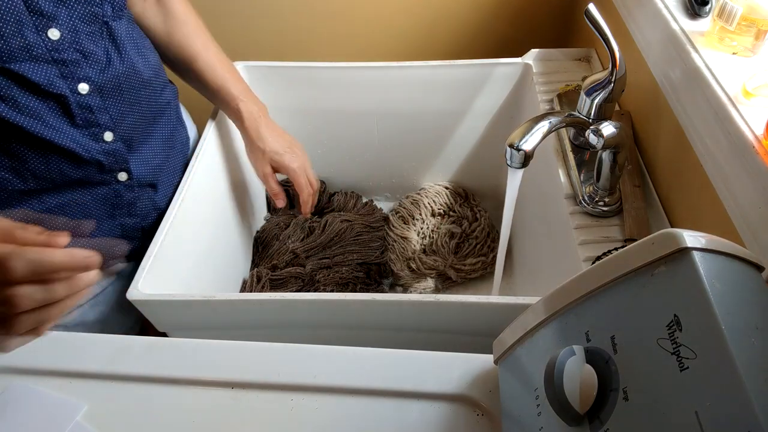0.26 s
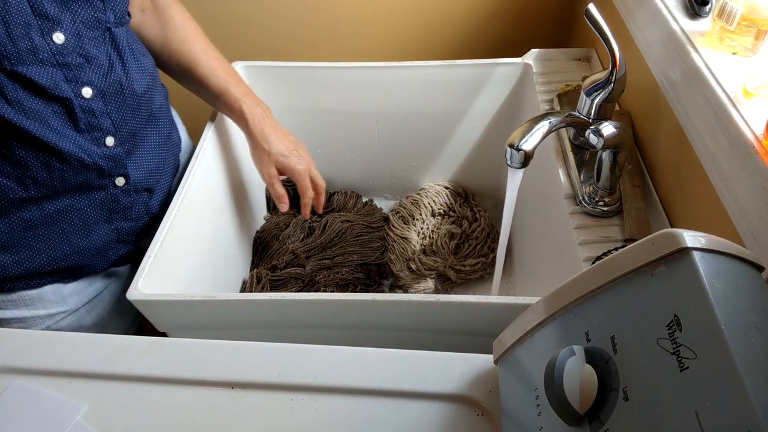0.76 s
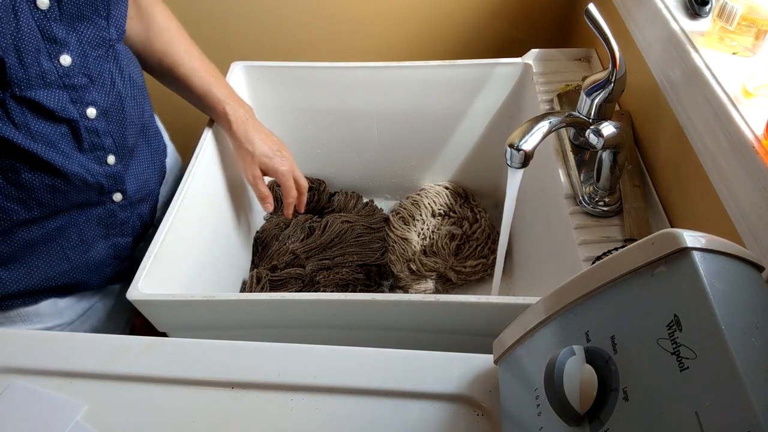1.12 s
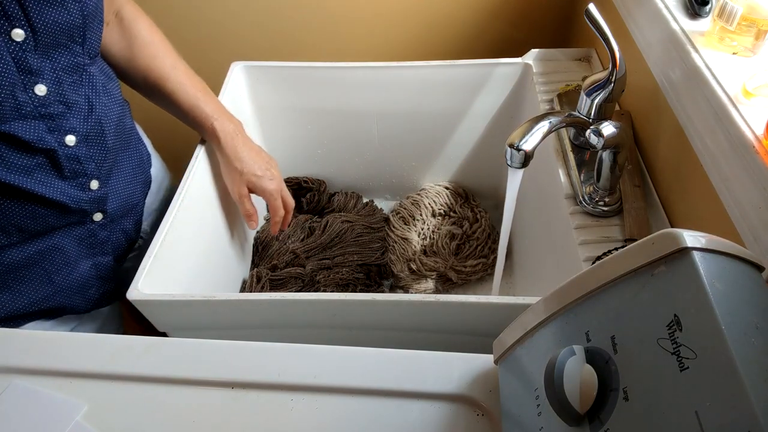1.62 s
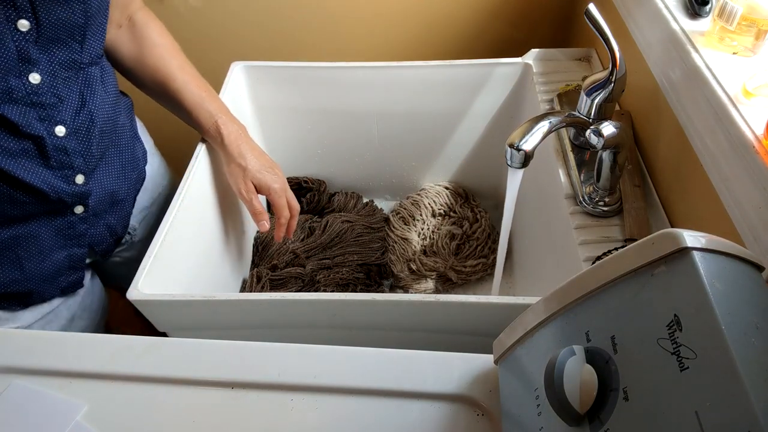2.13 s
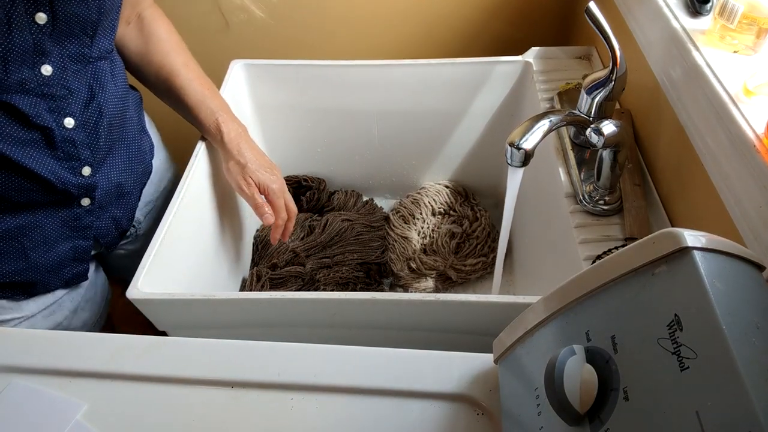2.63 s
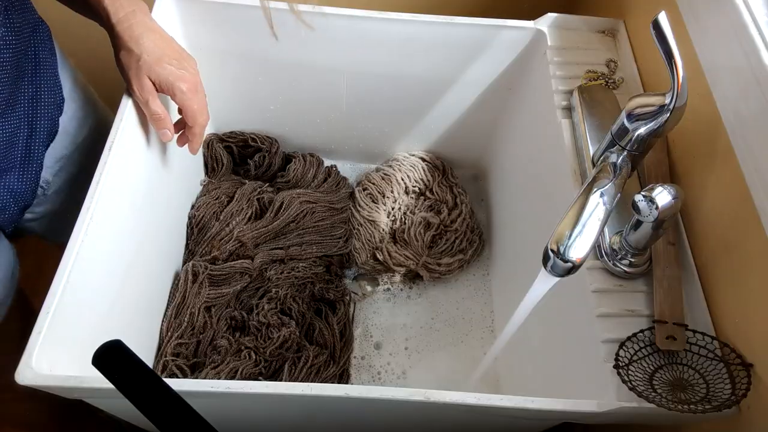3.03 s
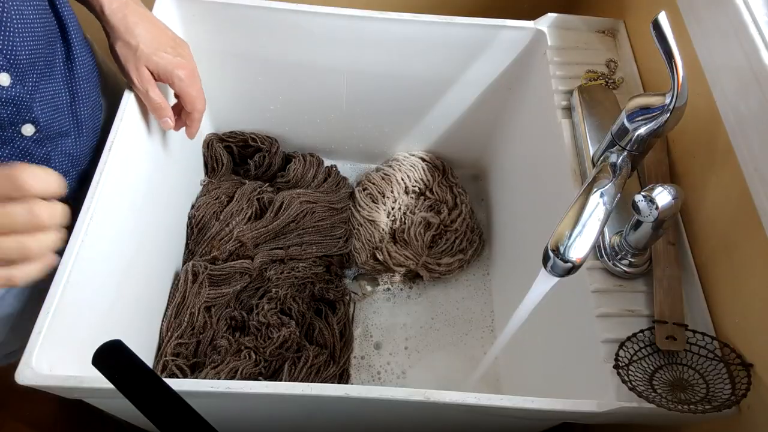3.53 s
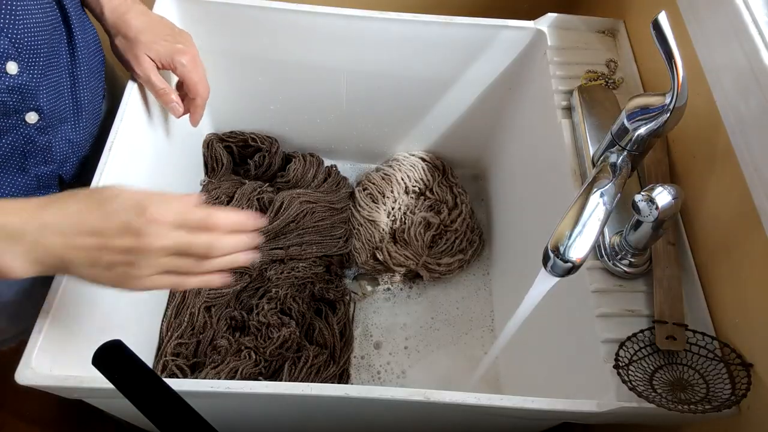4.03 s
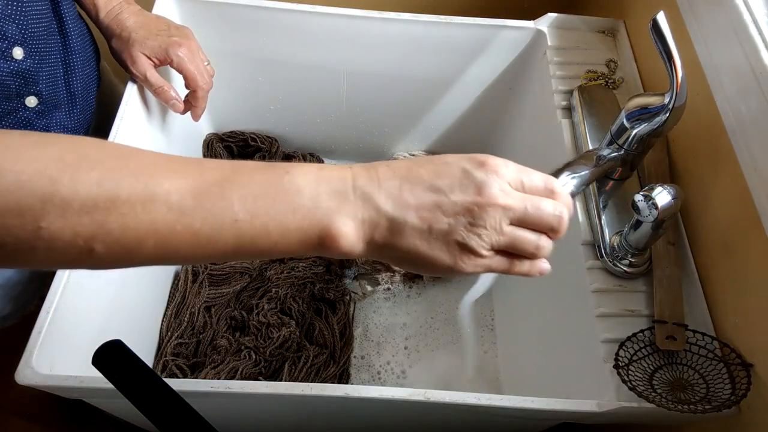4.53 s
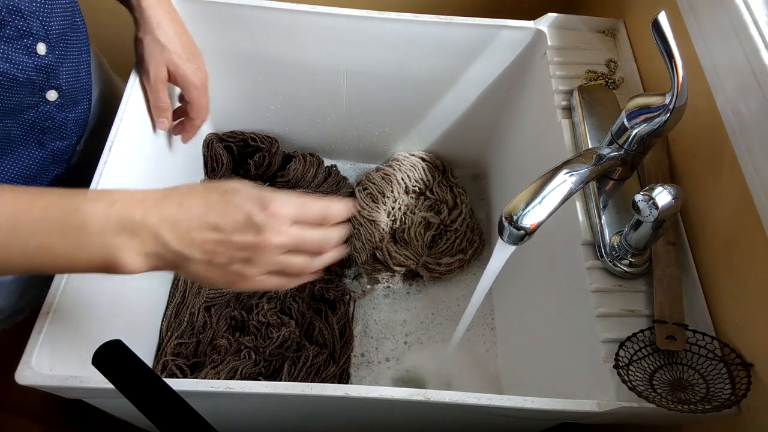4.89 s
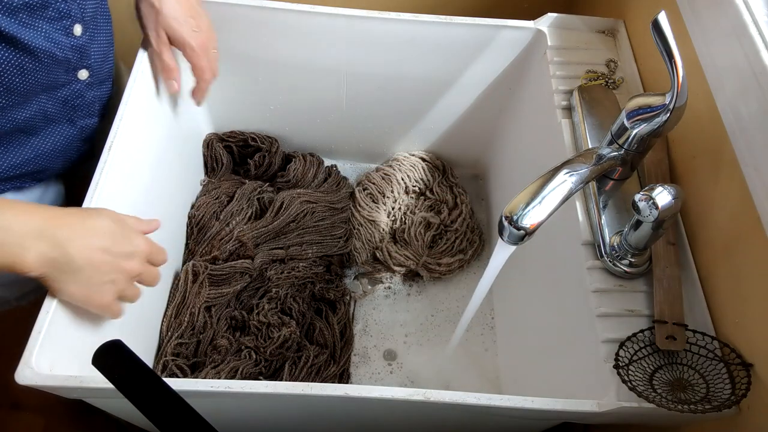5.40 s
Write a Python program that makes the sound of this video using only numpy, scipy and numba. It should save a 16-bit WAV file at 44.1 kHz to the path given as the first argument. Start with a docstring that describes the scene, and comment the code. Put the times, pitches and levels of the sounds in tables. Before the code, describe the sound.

Indoors and close up, a tap runs steadily into a deep plastic laundry tub, hissing with fine bubbles. Small wet swishes and ticks come early, then a loud hard knock on sheet metal with a duller rebound. The water cuts off abruptly, fades back in from a slightly different position, and later hands tick, splash and thump the tub. Mono, quite dry.

```python
"""Tap running into a laundry tub

A tap runs into a deep plastic tub, heard from two places: the stream cuts off hard, then fades in again.
Stream: filtered noise through resonances, plus bubbles (rising damped sines) and stray droplet ticks. Hands and
wet yarn: noise and droplet swishes, cracking ticks, thumps that ring the tub wall. A hard object knocks on
sheet metal and rebounds: decaying modes plus a dense noise clatter; its lighter bounces sound as ticks."""
import sys
import numpy as np
from scipy import signal
from scipy.fft import rfft, irfft, next_fast_len
from scipy.io import wavfile
from scipy.ndimage import uniform_filter1d
from numba import njit

SR = 44100
rng = np.random.default_rng(int(sys.argv[2]) if len(sys.argv) > 2 else 0)


def dump_mix(stems):
    """Bounce the given channels to the path in sys.argv[1] as a 16-bit WAV at rate SR."""
    frames = np.atleast_2d(stems).T  # one column per channel
    limited = np.clip(frames, -1, 1)  # hard clip at full scale
    pcm = np.round(limited * 32767).astype(np.int16)
    wavfile.write(sys.argv[1], SR, pcm)


N = 249385


def undb(db):
    """dB to amplitude ratio."""
    return 10 ** (np.asarray(db) / 20)


def unit(x):
    """Scales x to rms 1."""
    return x / np.sqrt(np.mean(x ** 2))


def on_log(hz, table, axis=1):
    """Table column interpolated on a log-frequency axis."""
    table = np.array(table, float)
    return np.interp(np.log(hz), np.log(table[:, 0]), table[:, axis])


def band(length, hz, octaves):
    """Noise with a bell-shaped spectrum on a log-frequency axis, rms 1."""
    f = np.fft.rfftfreq(length, 1 / SR) + 1
    bell = np.exp(-2 * (np.log2(f / hz) / octaves) ** 2)
    return unit(irfft(rfft(rng.standard_normal(length)) * bell, length))


def walk(rate_hz, size=N):
    """Wandering curve: straight slews between random levels, rms near 1.2."""
    k = int(SR / rate_hz)
    steps = np.repeat(rng.standard_normal(size // k + 1), k)
    return 1.45 * uniform_filter1d(steps, k)[:size]


def add(out, at_s, x):
    """Mixes x into out from at_s on."""
    i = int(at_s * SR)
    out[i:i + len(x)] += x[:len(out) - i]


@njit
def grains(start, hz, cycles, glide, size, length):
    """Damped sines whose pitch rises as they die away; cycles is the decay constant."""
    out = np.zeros(length)
    for g in range(len(start)):
        n = int(5 * cycles[g] * SR / hz[g])
        phase = 0.
        for j in range(min(n, length - start[g])):
            phase += 2 * np.pi * hz[g] / SR * (1 + glide * j / n)
            out[start[g] + j] += size[g] * np.exp(-5 * j / n) * np.sin(phase)
    return out


def stream(colour, resonances, flicker_db):
    """Hiss of falling water through its resonances; each octave wavers separately."""
    size = next_fast_len(N)
    f = np.fft.rfftfreq(size, 1 / SR) + 1
    # standing waves in the basin: fine fixed ripple over frequency, least in the bass
    ripple_db = 1.3 * walk(130)[:len(f)] * np.clip(f / 800, 0, 1)
    hiss = rfft(rng.standard_normal(size)) * undb(on_log(f, colour) + ripple_db)
    lift_db = sum(lift / (1 + (2 * (f - hz) / width) ** 2) for hz, width, lift in resonances)
    ringing = hiss * (undb(lift_db) - 1)
    ring_wander_db = 3.5  # scales the walk: resonances come and go as the water shifts
    out = 0
    for octave in range(6, 15):
        share = np.clip(1 - abs(np.clip(np.log2(f), 6, 14) - octave), 0, 1)
        plain, rung = irfft(np.array([hiss, ringing]) * share, size)[:, :N]
        wavering = plain + rung * undb(ring_wander_db * walk(4.6))
        out = out + wavering * undb(flicker_db * walk(9))
    return unit(out)


def bubbles(per_s=700):
    """Air bubbles torn in by the stream: short rings of rising pitch, a few louder than the rest."""
    when, spread, length, loud = rng.random((int(per_s * N / SR), 4)).T
    # length also raises the pitch
    hz = np.clip(3300 * 2 ** (2.317 * (spread + length - 1)), 200, 12000)
    size = undb(-2.5 * np.log(1 - loud))
    return unit(grains((when * N).astype(np.int64), hz, 0.86 + 10.8 * length, 0.047, size, N))


def basin(x):
    """Dense short reflections between hard tub walls: decaying noise convolved with the sound."""
    t60_s, echo_db = 0.12, 8.5  # echo energy against direct sound
    t = np.arange(SR // 5) / SR
    echo = rng.standard_normal(len(t)) * undb(-60 * t / t60_s)
    echo *= undb(echo_db) / np.sqrt(np.sum(echo ** 2))
    echo[0] = 1
    return unit(signal.fftconvolve(x, echo)[:N])


def tick(hz, octaves):
    """Hard damped-sine crack, then a short noisy tail; broad ticks die sooner."""
    t = np.arange(2 ** 12) / SR
    crack = 3 * np.exp(-t * hz * octaves / 3) * np.sin(2 * np.pi * hz * t)
    t60_s = 0.063 / (1 + 0.52 * octaves)
    tail = undb(-60 * t / t60_s) * (1 - np.exp(-t / 0.0004)) * band(len(t), hz, octaves)
    return crack + tail


def stray_droplets():
    """Faint ticks at random times, pitches and levels."""
    per_s, top_db, middle_hz = 9, -6, 2980  # top_db against the stream
    out = np.zeros(N)
    for at, pitch, drop in rng.random((int(per_s * N / SR), 3)):
        hz = middle_hz * 2 ** (2.2 * (pitch - .5))
        add(out, at * N / SR, undb(top_db - 6 * drop) * tick(hz, 0.35))
    return out


# stream spectrum at each place: f/Hz, level/dB per Hz
STREAM_A = [(18, -48.5), (30, -38), (53, -11), (100, -11), (199, -3.5), (354, -10), (425, -9), (582, -7.5),
            (737, -3), (1540, -12.5), (2340, -5.5), (4630, -8), (11300, -14.5), (14700, -17), (15900, -13)]
STREAM_B = [(18, -52), (30, -42), (69, -5.5), (124, -3.5), (354, -6.5), (414, -2.5), (582, -7.5),
            (700, -3.5), (798, -4.5), (1250, -5.5), (2600, -8.5), (3380, -4), (5010, -8.5), (7830, -8.5),
            (15900, -16.5)]
# resonances of the running water, from tub, tap or microphone; negative lift is a dip:
# f/Hz, width/Hz, lift/dB
RESONANCES_A = [(66, 23, 12.5), (171, 56, 3.5), (434, 31, 9.5), (854, 36, 6.5), (1320, 95, 6.5),
                (1765, 77, 7), (2324, 120, 1.5), (2750, 120, 0.5), (3320, 60, 4), (3800, 100, 1),
                (4700, 380, 2), (5760, 130, 2.5), (6530, 150, 6), (8000, 140, 5.5), (9460, 70, 4.5),
                (10130, 150, 7), (12600, 200, -3.5), (14800, 160, 6)]
RESONANCES_B = [(71, 21, 3.7), (164, 86, 5.1), (420, 48, 6.4), (716, 38, 6.6), (893, 50, 5.9),
                (1260, 96, 7.7), (1560, 27, 0.71), (1980, 250, 4.3), (3010, 27, 0.49), (3530, 40, 2),
                (4620, 130, 5), (7880, 290, 4.2), (9700, 60, 1.6), (9900, 50, 2.2), (12600, 160, 1.7)]
# steady flow, one row per place: level/dB, bubbles against hiss/dB
FLOW = [(-43, -8), (-44, -6)]


def water():
    """Hiss, bubbles and droplets from the first place, a gap, then a fade-in from the second."""
    cut_s, back_s = 2.751, 2.84
    fade_s, fade_from_db, fade_bend = 1, -23, 1.5
    swell_db, gurgle_db = 1, -0.5  # scale the slow walks of stream and bubbles
    t = np.arange(N) / SR
    air = basin(bubbles()) * undb(gurgle_db * walk(3))
    stray = stray_droplets()
    fade_left = np.clip(1 - (t - back_s) / fade_s, 0, 1)
    fade_in = (t > back_s) * undb(fade_from_db * fade_left ** fade_bend)
    places = zip(FLOW, (STREAM_A, STREAM_B), (RESONANCES_A, RESONANCES_B), (t < cut_s, fade_in))
    out = 0
    for (db, air_db), colour, resonances, heard in places:
        sound = stream(colour, resonances, flicker_db=1.26) + undb(air_db) * air + stray
        out = out + heard * undb(db + swell_db * walk(2.31)) * sound
    return out


def spatter(length, hz, octaves, per_s=500):
    """Separate droplets around a pitch, each a short ring, mixed with band noise."""
    when, spread, ring = rng.random((int(per_s * length / SR) + 2, 3)).T
    pitch_hz = np.clip(hz * 2 ** (octaves * (spread - .5)), 60, 15000)
    start = (when * length * .9).astype(np.int64)
    # longer rings are louder
    drops = grains(start, pitch_hz, 5. + 6. * ring, .1, undb(-3. * np.log(1 - ring)), length)
    return 0.47 * unit(drops) + 0.68 * band(length, hz, octaves)


# yarn and spray: t/s, length/s, level/dB, centre f/Hz, width/octaves
SWISHES = [(0.049, 0.39, -48.5, 2410, 1.05), (0.363, 0.23, -49, 4500, 1.5), (.582, .22, -42, 4680, 1.75),
           (1.028, .18, -40.5, 2180, 1.82), (1.219, .08, -48, 2470, 0.91), (2.017, 0.19, -59, 2780, 1.5),
           (3.992, 0.31, -46.5, 1970, 1.9), (4.478, 0.1, -43.5, 764, 1.44), (4.76, 0.086, -40, 4460, 1.6),
           (4.813, .06, -41.5, 492, 1.77), (4.831, .2, -41.5, 4470, 1.55), (4.88, 0.035, -39.5, 5560, 0.45),
           (4.914, 0.058, -36.5, 6460, 0.73), (4.994, 0.068, -40.5, 7300, 1.3),
           (5.474, .06, -44.5, 456, 2.3), (5.5, .14, -44, 159, 2.17)]


def swishes():
    """Wet yarn and spray: spatter with a quick rise and slower fall."""
    out = np.zeros(N)
    for at_s, length_s, db, hz, octaves in SWISHES:
        n = 2 * int(length_s * SR / 2)
        shape = np.sin(np.pi * np.linspace(0, 1, n) ** 0.5)
        add(out, at_s, undb(db) * shape * spatter(n, hz, octaves))
    return out


# fingers, droplets and light bounces of the knocked object (1.697, 1.839 s): t/s, level/dB, centre f/Hz,
# width/octaves
TICKS = [(.374, -41.5, 6670, 0.44), (.594, -37.5, 7000, .9), (.677, -37, 7200, .4), (1.246, -39, 15100, .3),
         (1.280, -37.5, 9700, 1.1), (1.355, -35, 8000, 1.5), (1.3895, -28.5, 8500, 1.5),
         (1.394, -32, 5500, 0.41), (1.697, -35, 14500, 0.48), (1.839, -41, 7240, 0.56),
         (4.390, -43.5, 5700, .45), (4.478, -31, 5000, 2.3), (4.479, -40.5, 700, 2),
         (4.7625, -31, 7100, 0.7), (4.766, -36, 5340, .7), (4.778, -31, 7000, 1.5), (4.793, -35, 7100, .5),
         (4.8, -35, 3770, 0.44), (4.8008, -28.5, 7300, 0.92), (4.806, -36, 5570, 0.5),
         (4.8175, -29, 4570, 2.2), (4.821, -29.5, 4470, 1.7), (4.826, -29.5, 4640, 1.5),
         (4.86, -38, 5570, 1.1), (4.898, -31, 5320, 2.3), (5.004, -38, 7800, 0.71), (5.032, -43, 11000, .5),
         (5.479, -45, 600, 1.8)]


def ticks():
    """Fingers, droplets and light bounces of the knocked object: one crack with a noisy tail each."""
    out = np.zeros(N)
    for at_s, db, hz, octaves in TICKS:
        add(out, at_s, undb(db) * tick(hz, octaves))
    return out


# tub wall modes: f/Hz, level/dB, t60/s
WALL = [(73.6, 2.5, 0.11), (139.3, 1, 0.099), (166.7, -1.5, 0.09), (200, -2, .07), (271, 2, 0.053),
        (430, 1, 0.19)]
# hand landings on the wall: t/s, strength/dB, favoured f/Hz
THUMPS = [(1.05, -38.5, 172), (4.415, -22, 167), (4.479, -26, 126), (4.509, -30, 155), (4.784, -33, 147),
          (4.82, -28, 148), (4.826, -37.5, 420), (4.875, -27, 150), (4.886, -32, 80), (5.483, -34, 140),
          (5.522, -28, 160), (5.549, -24, 185), (5.566, -23.5, 149), (5.572, -27, 71), (5.585, -32, 250)]


def thumps():
    """Soft hand on the tub wall: modes near the favoured pitch swell for about a cycle, then ring out."""
    spread_octaves = 0.22
    out = np.zeros(N)
    t = np.arange(2 ** 13) / SR
    rings = []
    for hz, db, t60_s in WALL:
        push = 1 - np.exp(-(t * hz * 1.12) ** 2)
        rings.append(undb(db - 60 * t / t60_s) * push * np.sin(2 * np.pi * hz * t))
    rings = np.array(rings)
    wall_hz = np.array(WALL)[:, 0]
    for at_s, db, hz in THUMPS:
        speaks = np.exp(-2 * (np.log2(wall_hz / hz) / spread_octaves) ** 2)
        add(out, at_s, undb(db) * speaks @ rings)
    return out


# knock and softer rebound: t/s, strength/dB, treble loss/dB per octave above 1 kHz, rise constant/s
KNOCKS = [(1.613, 0, 0, 0.0016), (1.72, -12, 2, 0.0045)]
# sheet metal modes: f/Hz, level before metal_db/dB, t60/s
METAL = [(64.6, -23.5, 1.7), (84, -21, 0.46), (157.7, -16, 0.59), (273, -25, 0.63), (447, -16, 0.42),
         (526, -21, 0.45), (611, -20.5, 0.3), (737, -18.5, 0.64), (936, -15, 0.41), (1127, -20, 0.41),
         (1296, -19, 0.41), (1580, -12.5, 0.45), (1830, -8, 0.36), (1890, -20, 0.36), (2360, -12, 0.49),
         (2412, -18, 0.4), (2530, -14.5, 0.35), (3500, -13.5, 0.15), (4329, -5.5, 0.15), (5630, -9.5, 0.21),
         (5860, -16.5, 0.24), (6200, -4, 0.12), (7600, -25, .16), (6780, -7.5, 0.21), (7800, -8.5, .15),
         (10600, -17, 0.2), (12700, 1.5, 0.085), (12950, -7, .05), (14950, -15, .12)]
# dense clatter in the room: f/Hz, level per noise band/dB, t60/s
CLATTER = [(60, -56, .9), (150, -43, 1.8), (400, -36.5, 1.02), (1000, -28.5, 0.32), (1985, -27, 0.46),
           (3980, -24.5, 0.32), (6960, -20.5, 0.21), (12500, -20, 0.11), (15600, -17, .11)]


def knock():
    """Blows ring the metal's modes and scatter a clatter, treble dying soonest; the rebound is duller."""
    metal_db = -15.5
    out = np.zeros(N)
    t = np.arange(2 ** 15) / SR
    for at_s, strength_db, loss_db, rise_s in KNOCKS:
        def dull_db(hz):
            return -loss_db * max(np.log2(hz / 1000), 0)

        ring = 0
        for hz, db, t60_s in METAL:
            # beating with close neighbours wavers the level, least in deep modes
            beat_db = 1.95 * min(hz / 300, 1) * walk(44, size=len(t))
            level_db = metal_db + db + dull_db(hz) - 60 * t / t60_s + beat_db
            ring = ring + undb(level_db) * np.sin(2 * np.pi * (hz * t + rng.random()))
        clatter = 0
        for hz in 60 * 2 ** np.arange(0, 8.2, 1 / 2):
            decay_db = -60 * t / on_log(hz, CLATTER, axis=2)
            level_db = on_log(hz, CLATTER) + dull_db(hz) + decay_db
            clatter = clatter + undb(level_db) * band(len(t), hz, 0.48)
        shape = (1 - np.exp(-t / rise_s)) * (1 - (t / t[-1]) ** 8)
        add(out, at_s, undb(strength_db) * shape * (ring + clatter))
    return out


def scene():
    """Sums all sources, same signal in both channels."""
    mono = water() + swishes() + ticks() + thumps() + knock()
    return np.array([mono, mono])


def record(dry):
    """Microphone loses the deepest bass; recorder cuts the top steeply."""
    bass_hz, top_hz = 42, 15720
    thin = signal.sosfilt(signal.butter(2, bass_hz, "high", fs=SR, output="sos"), dry)
    return signal.sosfilt(signal.ellip(14, .2, 80, top_hz, fs=SR, output="sos"), thin)


dry = scene()
out = record(dry)
dump_mix(out)
```